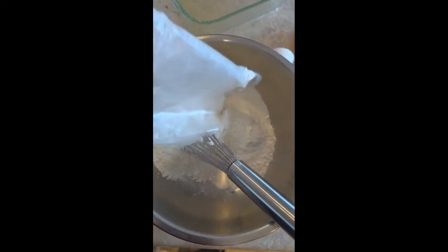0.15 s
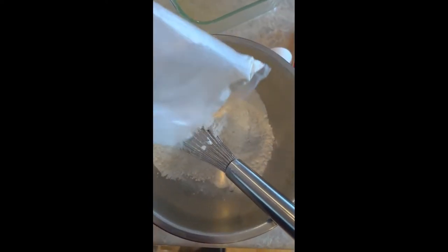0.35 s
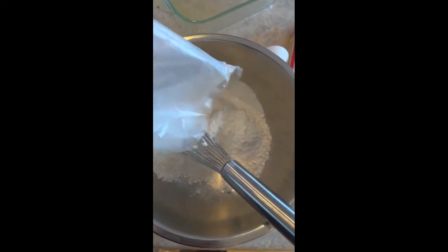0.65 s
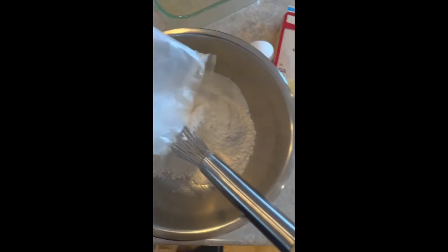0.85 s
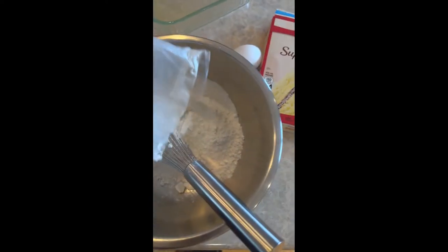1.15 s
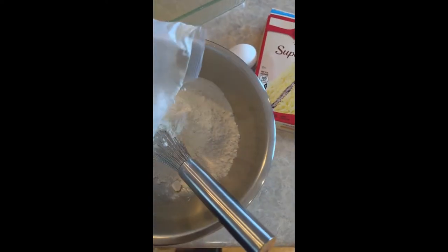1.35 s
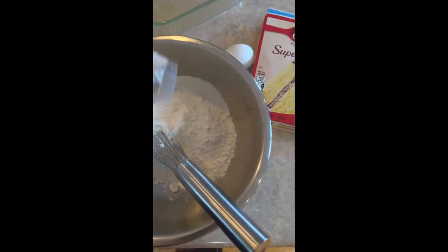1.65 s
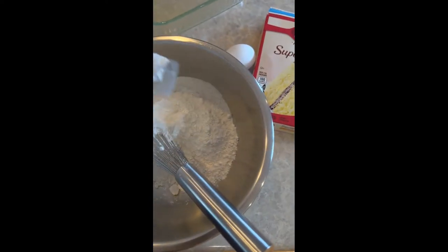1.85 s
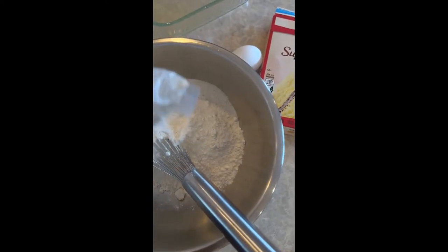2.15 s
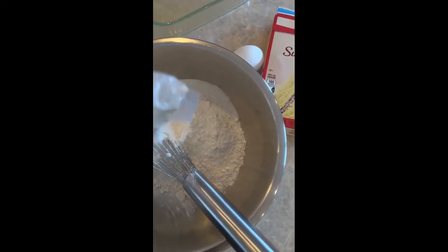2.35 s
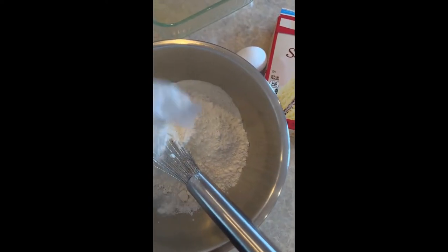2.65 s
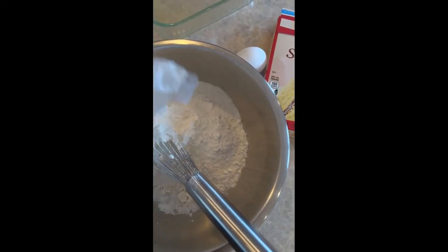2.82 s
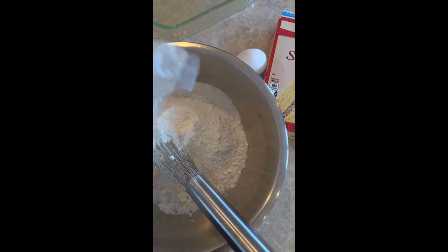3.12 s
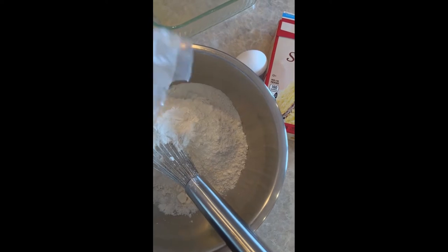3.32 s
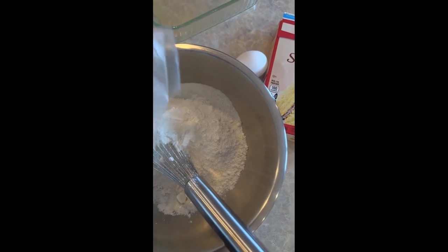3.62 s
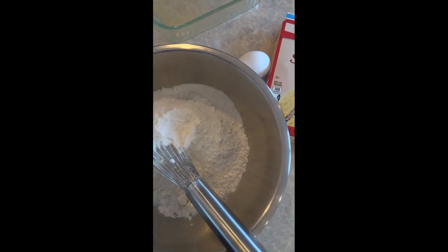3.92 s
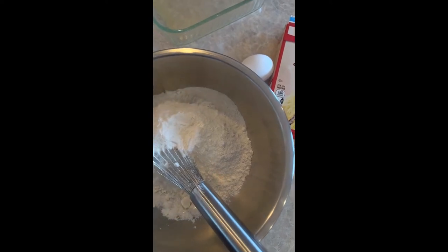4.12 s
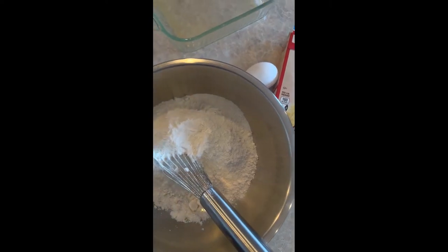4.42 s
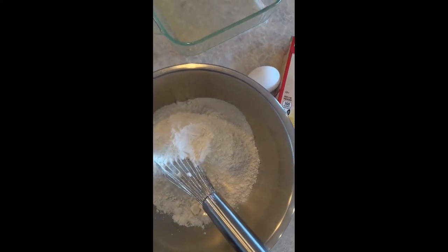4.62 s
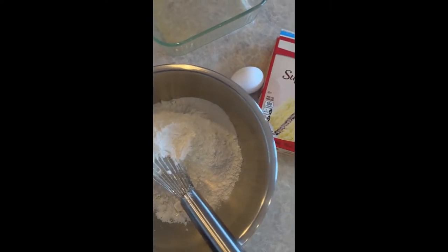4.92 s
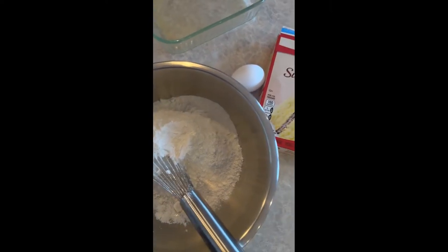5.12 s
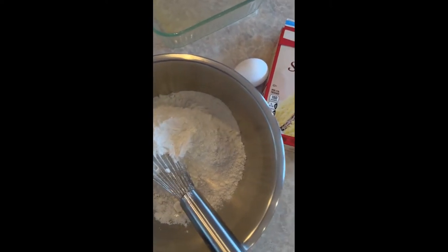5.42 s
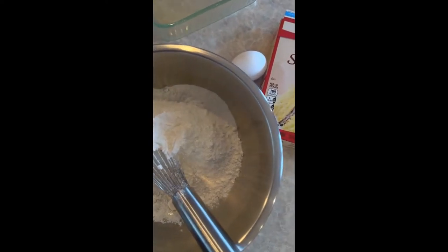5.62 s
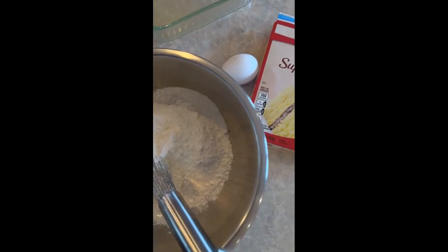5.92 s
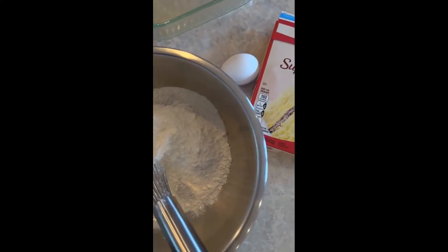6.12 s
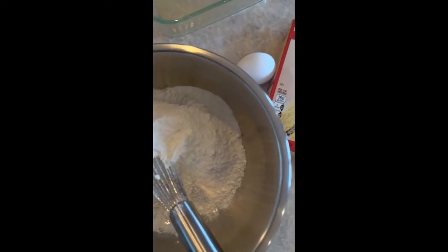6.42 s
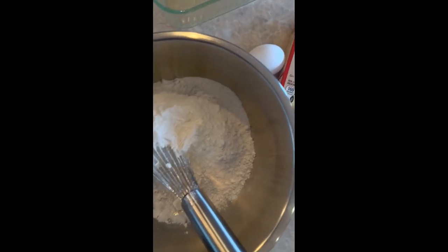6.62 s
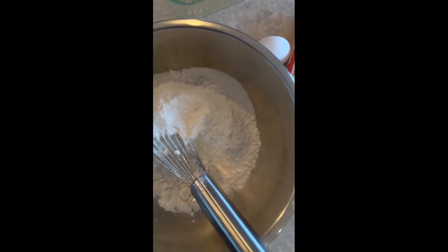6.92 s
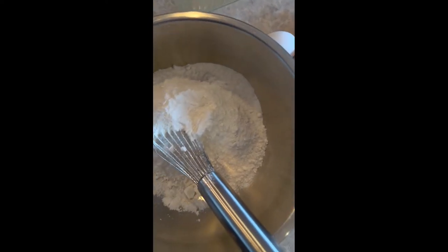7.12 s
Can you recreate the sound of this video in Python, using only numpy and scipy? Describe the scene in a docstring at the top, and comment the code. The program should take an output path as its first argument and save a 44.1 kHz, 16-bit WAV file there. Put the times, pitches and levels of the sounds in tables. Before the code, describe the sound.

Repeated quick shakes of crisp plastic film, two to six a second, snap and rustle very near in stereo, with powder landing softly on a heap and bassy air puffs. The bag is laid aside with small crackles and near silence. A drawer follows a little farther away with more room reverberation: a sharp knock, stuttering creaky groans, sliding hiss, bright steel clinks and a faint final rub of metal.

```python
"""A plastic bag of powder is shaken empty in a small kitchen and laid aside: filtered grains and noise
make its film rustle, and decaying sines make its creases snap. Shaped noise gives the puffs of air, and
low grains the powder landing softly on a heap. Later come faint squeaks of the film, then a drawer:
stick-slip pulses excite its resonances, filtered noise hisses, and struck or rubbed modes give its
metal utensils. A quiet room tone lies beneath."""
import sys
import numpy as np
from scipy import signal
from scipy.fft import rfft, irfft, next_fast_len
from scipy.io import wavfile
from scipy.ndimage import uniform_filter1d

SR = 44100
rng = np.random.default_rng(int(sys.argv[2]) if len(sys.argv) > 2 else 0)


def master(y):
    """Save y as 16-bit WAV."""
    cut = np.clip(np.atleast_2d(y).T, -1, 1)
    pcm = np.round(cut * 32767)  # scale
    wavfile.write(sys.argv[1], SR, pcm.astype(np.int16))


N = 319847
TIME = np.arange(N) / SR
STEPS = TIME[::32]  # coarse time grid for the level curves

# Background of the room: f/Hz, relative level/dB per Hz
ROOM_TONE = [(25, -12.5), (55, 9.5), (110, 4), (380, -9), (520, -16), (1200, -13), (3000, -18),
             (4300, -12.5), (5500, -22), (8000, -24), (11000, -27.5), (12500, -28.5), (16000, -41)]
ROOM_TONE_DB = -61

# Shakes or squeezes of the bag: t/s, rise/s, hold/s, then relative level/dB of rustle, crinkle and powder
SHAKES = [(0.1, 0.013, 0.027, -27.5, -26, -35), (0.178, .01, 0.008, -39, -44, -37),
          (0.293, 0.022, 0.071, -44.5, -42, -45), (0.42, 0.014, 0.027, -27.5, -27.5, -38.5),
          (0.473, 0.011, 0.021, -35.5, -39, -38), (0.589, 0.0036, 0.058, -48, -48.5, -50.5),
          (0.809, 0.023, 0.026, -38.5, -32, -48), (1.071, 0.0023, 0.0088, -28.5, -24.5, -39),
          (1.39, 0.0048, .02, -41, -36, -38), (1.463, .005, .04, -33, -33, -39),
          (1.604, .004, 0.062, -36, -41, -50), (1.735, .015, .055, -37, -37, -44),
          (1.863, 0.042, 0.11, -37.5, -44, -50), (2.05, 0.011, 0.059, -37, -43, -43),
          (2.245, 0.033, 0.026, -33.5, -36, -41.5), (2.329, 0.0076, 0.007, -36.5, -47, -45),
          (2.419, 0.0081, 0.076, -44, -48, -48.5), (2.57, 0.011, 0.024, -33.5, -34.5, -41),
          (2.655, 0.016, 0.015, -43.5, -40.5, -42), (2.775, 0.015, 0.035, -35.5, -34, -39),
          (2.959, 0.025, 0.049, -36, -39, -41.5), (3.165, 0.004, 0.017, -32.5, -30.5, -35.5),
          (3.22, 0.0058, 0.046, -40.5, -56, -46), (3.374, 0.018, 0.013, -32, -35.5, -38),
          (3.433, 0.0073, 0.0046, -34, -40, -40), (3.55, 0.015, 0.025, -28.5, -27.5, -37.5),
          (3.61, 0.011, 0.074, -37, -38, -43), (3.819, 0.015, 0.29, -60, -50, -72.5),
          (4.281, 0.0033, 0.11, -59, -54, -77), (4.53, 0.0029, 0.033, -39, -35.5, -50),
          (4.602, 0.0087, .04, -48, -42.5, -57.5), (4.78, .02, 0.023, -63, -72, -65)]
SHAKE_FALL_S = 0.024
# Stirring of the film between shakes and as it is laid aside: t/s, relative rustle level/dB
STIRRING = [(0.0, -45), (0.25, -52), (0.7, -58.5), (0.9, -44.5), (1.03, -58.5), (1.16, -47), (1.9, -45),
            (2.7, -54), (2.86, -47.5), (3.08, -54), (3.72, -54.5), (4.14, -62.5), (4.24, -67.5),
            (4.7, -55.5), (4.96, -89), (5.22, -68), (5.62, -61.5), (5.8, -90)]
# Relative to that rustle; the powder's value holds midway through the emptying
STIR_CRINKLE_DB, STIR_POWDER_DB = 0, -5
EMPTY_S = 3.75  # from here the trickle of powder between shakes weakens by 6 dB within 0.5 s

# Spectra of the folding film and of its finer creases: f/Hz, relative level/dB per Hz
RUSTLE = [(300, -11.5), (500, -13), (800, -7.5), (1250, 3), (1520, -4), (1900, 2.5), (3100, -6.5),
          (4500, -12.5), (8000, -20.5), (12000, -21.5)]
CRINKLE = [(2500, 4), (4000, 0.5), (5700, 0), (8200, -1), (10500, -1.5), (12500, -7.5), (16000, -13.5)]

# Spectra of falling powder and of moving air: f/Hz, relative level/dB per Hz
POWDER = [(90, -9.5), (150, -1.5), (230, -3), (400, -3), (600, 0), (1000, -22.5)]
PUFF = [(15, -42), (35, -16), (60, 3.5), (100, -2), (160, -11), (300, -28)]
# Puffs of air from the billowing bag: t/s, level/dB
PUFFS = [(0.08, -38), (0.16, -34.5), (0.35, -33.5), (0.45, -34.5), (0.675, -42), (0.86, -42.5),
         (1.095, -37), (1.481, -48), (2.1, -39), (2.365, -36), (2.59, -37.5), (2.81, -40), (2.985, -34),
         (3.18, -31.5), (3.395, -33.5), (3.47, -39), (3.565, -36), (3.73, -52), (4.388, -54), (4.589, -47)]
PUFF_RISE_S, PUFF_HOLD_S, PUFF_FALL_S = 0.014, 0.011, 0.026
DRAUGHT_DB = -5.5  # air that moves along with the powder, relative to it

# Single creases that snap through, loud and faint:
# t/s, relative crack level/dB, crack f/Hz, relative sheet level/dB
SNAPS = [(0.0959, -9, 6400, -30), (0.127, -8, 8200, -18), (0.1452, -10, 7100, -33),
         (0.1535, -19, 5100, -18.5), (0.1776, -5.5, 7600, -24), (0.2935, -17.5, 8950, -30),
         (0.3063, -17, 4780, -33), (0.4205, -7.5, 5030, -24), (0.4651, -11, 4000, -21),
         (0.4972, -7.5, 8660, -26), (0.5108, -14.5, 7700, -29), (0.5878, -11.5, 2740, -41),
         (0.626, -18, 3820, -25), (0.793, -15, 8400, -28), (0.8375, -11.5, 9000, -27),
         (0.8483, 1, 6100, -17), (0.8567, -2, 5350, -22), (0.9562, -42, 3600, -33),
         (1.0368, -29, 2400, -32.5), (1.0919, -5, 6300, -21), (1.1206, -21, 5500, -36),
         (1.1405, -16, 6400, -28), (1.1883, -17, 5470, -27), (1.2059, -10, 5700, -28),
         (1.2448, -11.5, 4070, -25.5), (1.2918, -29, 4600, -32), (1.31, -19.5, 7500, -27),
         (1.3484, -12, 5380, -22), (1.3776, -35, 2700, -20), (1.3873, -8.5, 6300, -34),
         (1.4059, -10.5, 4900, -16.5), (1.5317, -13, 4600, -38), (1.5776, -16.5, 4500, -23),
         (1.6039, -9, 4995, -20), (1.6186, -12, 3900, -20), (1.6677, -12.5, 3720, -20.5),
         (1.7141, -9.5, 3640, -23.5), (1.7629, -14, 4558, -19), (1.9375, -13, 3040, -31),
         (1.9681, -17, 4800, -25), (2.0539, -10.5, 4252, -20.5), (2.1751, -18, 7340, -28),
         (2.3315, -20, 5700, -29), (2.418, -27, 3813, -29.5), (2.4753, -17.5, 8230, -25),
         (2.5526, -13, 5960, -25), (2.6707, -24.5, 8500, -29), (2.776, -13.5, 7320, -25),
         (2.8534, -15.5, 3140, -33), (3.1227, -18.5, 4600, -32), (3.1656, -10, 3217, -17.5),
         (3.1784, -11, 6600, -20), (3.25, -27, 6630, -33), (3.3321, -20.5, 6000, -30),
         (3.525, -14.5, 7500, -22), (3.6709, -12, 6700, -33), (3.7198, -19.5, 5630, -51),
         (3.7443, -22, 4940, -51), (3.8296, -19.5, 3750, -50), (3.8504, -29, 4900, -48),
         (3.9046, -18, 4470, -41), (3.9702, -20, 5000, -52), (4.0327, -28, 3800, -62),
         (4.1477, -19, 4620, -40), (4.372, -30, 2475, -61), (4.531, -19, 5900, -29),
         (4.5646, -22, 6610, -48), (4.6313, -19.5, 4860, -51)]
# Random creases: greatest rate, centre frequency, relative crack level at brisk handling,
# sheet level relative to the crack, standard deviation of level
CREASES_PER_S, CREASE_HZ = 42, 4500
CREASE_DB, CREASE_SHEET_DB, CREASE_SPREAD_DB = -22, -9.5, 2
BRISK_DB, STILL_DB = -40, -62  # rustle of brisk handling; rustle below which no random crease snaps
CREASE_FOLLOWS = 0.63  # share of the rustle's swing in dB that the cracks follow
# Bending wave: level relative to the sheet, frequency limits, centre glide time constant, decay constant
BEND_DB, BEND_START_HZ, BEND_END_HZ = -12, 1298, 189.3
BEND_GLIDE_S, BEND_DECAY_S = 0.00603, 0.0094

# Squeaks of the film as the bag is put aside: t/s, level/dB
SQUEAKS = [(5.366, -58.5), (5.426, -54), (5.439, -59), (5.49, -63)]
SQUEAK_HZ = 4400

# Catches of the drawer runners: t/s, hold/s, relative level/dB, first and last slip rate/Hz, roughness
GROAN = [(5.688, 0.014, -48.5, 148, 147, 0.67), (5.769, 0.036, -57, 135, 122, 0.84),
         (5.858, 0.0095, -17, 125, 130, .52), (5.91, .025, -15, 136, 146, 0.44),
         (5.969, 0.0237, -17, 160, 176, .16), (6.043, 0.014, -17, 186, 182, .19),
         (6.337, .008, -28.5, 208, 196, 0.24), (6.378, 0.027, -24, 166, 141, 0.19),
         (6.455, 0.016, -33.5, 161, 158, 0), (6.55, 0.041, -20, 199, 204, 0.08),
         (6.76, 0.0515, -47.5, 210, 190, .8), (6.868, 0.021, -41.5, 267, 264, 1.03)]
GROAN_RISE_S, GROAN_FALL_S = 0.012, 0.026
# A groan dying down towards this relative level breaks up into uneven slips
CHATTER_DB, CHATTER_ROUGH = -41, 0.6
# Resonances of the drawer's box: f/Hz, width/Hz, relative level/dB
BOX_MODES = [(170, 74.4, -1.5), (262, 42, 0), (352, 42, 1.5), (410.7, 34, 2), (455, 38, -1.5),
             (561, 35, -6), (696.5, 36, -11), (854, 38, -11.5), (1009, 50, -21), (1168, 22, -16),
             (1490, 130, -22)]
# Cabinet rumble while the drawer is handled: t/s, hold/s, level/dB
RUMBLE = [(5.7, .25, -51.5), (6.1, 1.1, -62)]
# Pulls on the drawer: t/s, hold/s, relative hiss level/dB
PULLS = [(5.79, .29, -43.5), (6.12, 0.25, -43), (6.51, 0.084, -54.5), (6.86, .1, -65), (7.2, 0.011, -64)]
PULL_RISE_S, PULL_FALL_S = 0.02, 0.025
# Spectrum of the sliding hiss: f/Hz, relative level/dB per Hz
SLIDE_HISS = [(59, -60), (100, -11), (202, -1.5), (315, -9), (358, -7), (492, -17), (705, -10.5),
              (1250, -14), (2420, -11.5), (3320, -25.5), (6840, -21), (8280, -26), (9210, -25),
              (12900, -30), (16000, -33)]
# Resonances of the runners: f/Hz, width/Hz, relative level/dB
RUNNER_MODES = [(730, 23, -0.5), (874, 43, -1.5), (1025, 55, 2.5), (1703, 75, -2), (1870, 240, -8),
                (2418, 130, -10), (3004, 70, -8), (3500, 120, -9), (4050, 380, -10.5), (4570, 140, -8),
                (6240, 170, -10), (7170, 90, -20.5), (9480, 50, -10.5), (10500, 37, -25)]

# Dull ticks in the drawer: t/s, relative level/dB, ring f/Hz
TICKS = [(5.8039, -12, 6730), (6.6939, -33, 8190), (6.7568, -35.5, 4570), (7.0027, -35.5, 7530),
         (7.0607, -46, 7640), (7.0963, -43, 7640), (7.1182, -39, 7640)]
# Utensils knocking together: t/s, relative level/dB
CLINKS = [(5.8041, -13), (5.9404, -27), (5.989, -24.5), (6.0048, -22.5), (6.127, -51), (6.2212, -33),
          (6.354, -48), (6.5918, -50)]
# Modes of the struck steel: f/Hz, relative level/dB, t60/s
STEEL_MODES = [(4500, -22, 0.072), (6220, 3.5, 0.073), (7030, 5.5, .12), (7120, 6.5, 0.14),
               (7580, -4, 0.17), (9550, -17, 0.83), (10310, -34.5, 0.65)]
# A utensil drawn along its neighbours: t/s, hold/s, relative level/dB
RUBS = [(6.88, .1, -56.5), (7.05, 0.076, -56)]
RUB_RISE_S, RUB_FALL_S = 0.045, 0.023
# Modes of the rubbed utensil: f/Hz, width/Hz, relative level/dB
RUBBED_MODES = [(1380, 14, -18), (1433, 9, -0.5), (3560, 160, -4.5), (6100, 130, -6), (6890, 27, -14),
                (7400, 24, -13.5), (7500, 22, -9), (9870, 65, -32)]

MIC_LAG_S = 0.00013  # delay of the right microphone for sound from the left
KITCHEN_T60_S = 0.33
CUTOFF_HZ = 16000
# Gain of the left-right difference: f/Hz, level/dB
PORTS = [(60, 13), (130, 0), (250, 12.5), (500, 9.5), (1000, 0.5), (2000, -4), (4000, 1.5), (8000, 1),
         (13000, -0.5)]


def from_db(db):
    """Amplitude ratio: 20 dB is a factor of ten."""
    return 10 ** (np.asarray(db) / 20)


def rms_one(x):
    """Normalisation: scale to unit mean power."""
    return x / np.sqrt(np.mean(x ** 2) + 1e-20)


def together(a_db, b_db):
    """Incoherent addition: the powers of unrelated sounds add."""
    return 10 * np.log10(from_db(a_db) ** 2 + from_db(b_db) ** 2)


def in_time(rows):
    """Linear interpolation: each column of a curve at every sample."""
    s, *columns = np.transpose(rows)
    return [np.interp(TIME, s, column) for column in columns]


def swell(s, held_s, db, rise_s, fall_s):
    """Exponential growth and decay: power of one gesture that rises, holds and dies away."""
    before = np.maximum(s - STEPS, 0) / rise_s
    after = np.maximum(STEPS - s - held_s, 0) / fall_s
    return (from_db(db) * np.exp(-np.minimum(before + after, 20))) ** 2


def level_of(gestures):
    """Incoherent addition: level in dB of several gestures together, at every sample."""
    return np.interp(TIME, STEPS, 10 * np.log10(sum(gestures)))


def swells(rows, rise_s, fall_s):
    """Superposition: level of gestures (t/s, hold/s, level/dB) that share one rise and one fall."""
    return level_of(swell(s, held_s, db, rise_s, fall_s) for s, held_s, db in rows)


def drift(rate):
    """Slow random modulation: unit rms, joining about rate random values a second by lines."""
    knots = rng.standard_normal(8000)
    return rms_one(np.interp(TIME * rate, np.arange(len(knots)), knots))


def colour(x, spectrum):
    """Linear filtering: weight x by a spectrum that falls steeply beyond its ends; unit rms."""
    hz, db = np.transpose(spectrum)
    size = next_fast_len(N)
    octave, known = np.log2(np.fft.rfftfreq(size, 1 / SR) + 1), np.log2(hz)
    beyond = np.abs(octave - np.clip(octave, known[0], known[-1]))
    gain = from_db(np.interp(octave, known, db) - 20 * beyond)  # 20 dB per octave outside
    return rms_one(irfft(rfft(x, size) * gain, size)[..., :N])


def ring(clicks, hz, t60):
    """Damped oscillator: a unit click starts a decaying sine of initial amplitude one."""
    radius, angle = from_db(-60 / (t60 * SR)), 2 * np.pi * hz / SR
    poles = [1, -2 * radius * np.cos(angle), radius * radius]
    return signal.lfilter([0, np.sin(angle)], poles, clicks + 1e-18)


def resonate(force, modes):
    """Modal superposition: parallel resonances of alternating sign, their peaks set by level."""
    out = 0
    for k, (hz, width, db) in enumerate(modes):
        out = out + (-1) ** k * from_db(db) * width * ring(force, hz, 2.2 / width)
    return out


def two_mics(x, lag_s):
    """Time difference of arrival: sound reaches the right microphone lag_s after the left."""
    size = next_fast_len(len(x) + 64)
    delay = np.exp(-2j * np.pi * np.fft.rfftfreq(size, 1 / SR) * lag_s)
    late = irfft(rfft(x, size) * delay, size)
    return np.array([x, late[:len(x)]])


def diffuse(count, alike_hz):
    """Diffuse-field coherence: stereo noise alike in the bass and unrelated in the treble."""
    mid, side = rng.standard_normal((2, count))
    side = signal.sosfilt(signal.butter(2, alike_hz, "high", fs=SR, output="sos"), side)
    return np.array([mid + side, mid - side]) / np.sqrt(2)


def add(out, s, sound):
    """Superposition: mix a short stereo sound in at time s."""
    at = max(round(s * SR), 0)
    out[:, at:at + sound.shape[1]] += sound[:, :N - at]


def grains(per_s, spread_db, low_hz, high_hz, cycles, lag_s, count=16):
    """Random impulse excitation: contacts of random size and pitch, from straight ahead or the left."""
    at = np.flatnonzero(rng.random(N) < per_s / SR)
    sizes = from_db(spread_db * np.minimum(rng.exponential(1, N), 3)) * rng.choice([-1, 1], N)
    dealt = rng.integers(0, count, N)  # pitch given to each contact
    places = np.zeros((2, N))
    for k, hz in enumerate(np.geomspace(low_hz, min(high_hz, SR * 0.45), count)):
        clicks, mine = np.zeros(N), at[dealt[at] == k]
        clicks[mine] = sizes[mine] * hz ** 0.75
        places[k % 2] += ring(clicks, hz, cycles / hz)
    return rms_one(places[0] + two_mics(places[1], lag_s))


def flex(x, depth_db, size=512):
    """Time-varying resonance: patches of the spectrum swell and fade at random, as in a folding sheet."""
    frames = signal.stft(x, nperseg=size)[2]
    patches = uniform_filter1d(rng.standard_normal(frames.shape[1:]), size=3, axis=0)
    gain = from_db(depth_db * rms_one(uniform_filter1d(patches, size=4, axis=1)))
    return signal.istft(frames * rms_one(gain), nperseg=size)[1][:, :N]


def room_tone():
    """Stationary background noise: a steady coloured diffuse field."""
    return from_db(ROOM_TONE_DB) * colour(diffuse(N, 1000), ROOM_TONE)


def shaking():
    """Common excitation: each shake swells rustle, crinkle and powder above the stirring of the film."""
    stir_db, = in_time(STIRRING)
    emptying_db = np.interp(TIME - EMPTY_S, [0, 0.5], [3, -3])
    between = stir_db, stir_db + STIR_CRINKLE_DB, stir_db + STIR_POWDER_DB + emptying_db
    levels = []
    for layer, low_db in enumerate(between):
        shake_db = level_of(swell(s, held_s, dbs[layer], rise_s, SHAKE_FALL_S)
                            for s, rise_s, held_s, *dbs in SHAKES)
        levels.append(together(shake_db, low_db))
    return levels


def crinkling(rustle_db, crinkle_db):
    """Impulsive film buckling: folds rustle and small creases fizz; gently handled, the film swishes."""
    crisp = np.interp(rustle_db, [-64, -50], [0.15, 0.9])  # share of separate grains
    swish = np.sqrt(1 - crisp ** 2) * rms_one(diffuse(N, 1600))
    folds = grains(per_s=1900, spread_db=2.5, low_hz=390, high_hz=9500, cycles=8.6, lag_s=0.00008)
    rustle = colour(crisp * folds + swish, RUSTLE) * rms_one(from_db(2.5 * drift(80)))
    creases = grains(per_s=2000, spread_db=6.5, low_hz=2760, high_hz=15500, cycles=10, lag_s=MIC_LAG_S)
    fizz = colour(crisp * creases + swish[:, ::-1], CRINKLE)  # swish reversed in time to differ
    return rustle * from_db(rustle_db - 2.0) + fizz * from_db(crinkle_db - 2.5)


def falling_powder(level_db):
    """Damped impact: soft clumps thud on the heap as low, short-lived grains."""
    clumps = grains(per_s=500, spread_db=4, low_hz=107, high_hz=813, cycles=5, lag_s=0.00006, count=10)
    return colour(clumps, POWDER) * from_db(level_db)


def air_puffs(powder_db):
    """Flow noise: the billowing bag fans low-frequency air at the microphones."""
    puff_db = swells([(s, PUFF_HOLD_S, db) for s, db in PUFFS], PUFF_RISE_S, PUFF_FALL_S)
    return colour(rng.standard_normal(N), PUFF) * from_db(together(puff_db, powder_db + DRAUGHT_DB))


def snap(hz, sheet_db, crack_t60, scatter_db, scatter_t60):
    """Impulse response: a brief crack, the ring of the sheet around it, one early echo and scatter."""
    t = np.arange(2048) / SR
    pitches = hz * np.array([0.62, 1, 1.35, 1.9]) * np.exp(rng.normal(0, 0.084, 4))
    heights = np.array([0.62, -0.96, 0.6, -0.55]) * (pitches < CUTOFF_HZ)
    crack = heights @ np.sin(2 * np.pi * pitches[:, None] * t) * 1000 ** (-t / crack_t60)
    sheet_hz = np.array([750, 1300, 2100]) * np.exp(rng.normal(0, 0.14, 3))
    sheet = np.array([0.45, -0.7, 0.7]) @ np.sin(2 * np.pi * sheet_hz[:, None] * t) * np.exp(-t / 0.0016)
    lag_s = MIC_LAG_S * (rng.random() < 0.7)  # from the left or from straight ahead
    direct = two_mics(crack, lag_s) + from_db(sheet_db) * two_mics(sheet, lag_s * 0.086)
    echo = np.roll(direct, round(rng.uniform(0.0008, 0.0024) * SR), axis=1)
    direct = direct + from_db(-8) * echo
    scatter = diffuse(len(t), 2200) * 1000 ** (-t / scatter_t60)
    scatter = scatter / np.sqrt(np.sum(scatter[0] ** 2))
    scattered = signal.fftconvolve(direct[:1], scatter, axes=1)[:, :len(t)]
    return direct + from_db(scatter_db) * scattered


def bending():
    """Dispersion: the lows of a bending wave arrive last, giving a short falling chirp."""
    t = np.arange(2048) / SR
    glide_s = BEND_GLIDE_S * np.exp(0.25 * rng.standard_normal())
    hz = BEND_END_HZ + (BEND_START_HZ - BEND_END_HZ) * np.exp(-t / glide_s)
    chirp = np.sin(2 * np.pi * np.cumsum(hz) / SR) * np.exp(-t / BEND_DECAY_S)
    return two_mics(chirp, 0.00005)


def random_creases(rustle_db):
    """Poisson-like events: creases snap more often and harder as the film is worked; rows as in SNAPS."""
    busy = np.clip((rustle_db - STILL_DB) / (BRISK_DB - STILL_DB), 0, 1)
    at = np.flatnonzero(rng.random(N) < CREASES_PER_S * busy / SR)
    size, pitch = rng.standard_normal((2, N))[:, at]
    db = CREASE_DB + CREASE_FOLLOWS * (rustle_db[at] - BRISK_DB) + CREASE_SPREAD_DB * size
    return list(zip(at / SR, db, CREASE_HZ * np.exp(0.3 * pitch), db + CREASE_SHEET_DB))


def bag_snaps(rustle_db):
    """Snap-through buckling: each crease cracks and sends a bending wave through the film."""
    out = np.zeros((2, N))
    for s, db, hz, sheet_db in list(SNAPS) + random_creases(rustle_db):
        crack = snap(hz, sheet_db - db + 0.5, crack_t60=0.0024, scatter_db=-2.5, scatter_t60=0.016)
        add(out, s, from_db(db + 1.0) * crack)
        add(out, s, from_db(sheet_db + BEND_DB) * bending())
    return out


def squeaks():
    """Friction-excited resonance: film rubs on film in short thin chirps of narrow-band noise."""
    level = sum(from_db(db) * np.exp(-((TIME - s) / 0.0038) ** 2) for s, db in SQUEAKS)
    return level * rms_one(ring(rng.standard_normal(N), SQUEAK_HZ, 0.013))


def catching():
    """Stick-slip control: slip rate, level and roughness; each groan glides and roughens as it dies."""
    level_db = swells([row[:3] for row in GROAN], GROAN_RISE_S, GROAN_FALL_S)
    points = []
    for s, held_s, _, first, last, rough in GROAN:
        points += [(s, first, rough), (s + held_s, last, rough)]
    per_s, rough = in_time(points)
    chatter = CHATTER_ROUGH / (1 + from_db(level_db - CHATTER_DB))
    return per_s, level_db, np.maximum(rough, chatter)


def groan():
    """Stick-slip oscillation: slip pulses drive the box; smooth slips are rounder, rough ones noisy."""
    per_s, groan_db, rough = catching()
    rough = np.clip(rough, 0, 1)
    turns = np.cumsum(per_s * (1 + 0.1 * rough * drift(150))) / SR
    pulses = np.diff(np.floor(turns), prepend=0)  # one pulse for each whole turn
    slips = rms_one(pulses * from_db(5 * rough * drift(200)))
    rounded = signal.sosfilt(signal.butter(4, 470, fs=SR, output="sos"), slips)
    sharp = np.clip(0.037 + 2.0 * rough, 0, 1)
    force = (1 - sharp) * rms_one(rounded) * 0.19 + sharp * slips
    force = force + 1.9 * rough * rng.standard_normal(N)
    box = resonate(force, BOX_MODES)
    box = signal.sosfilt(signal.butter(3, 95, "high", fs=SR, output="sos"), box)
    box = box / np.sqrt(uniform_filter1d(box ** 2, size=900) + 1e-12)  # even out the running level
    return two_mics(box, 0.000062) * from_db(groan_db - 1.5)


def cabinet_rumble():
    """Structure-borne noise: the cabinet rumbles at low frequency while the drawer is handled."""
    return colour(rng.standard_normal(N), PUFF) * from_db(swells(RUMBLE, PULL_RISE_S, PULL_FALL_S))


def sliding_hiss():
    """Sliding friction: a fluttering broadband hiss sets the runners ringing."""
    hiss_db = swells(PULLS, PULL_RISE_S, PULL_FALL_S)
    ringing = rms_one(resonate(diffuse(N, 1900), RUNNER_MODES))
    grind = colour(diffuse(N, 1600), SLIDE_HISS) + from_db(-3.5) * ringing
    return flex(grind, depth_db=2.0) * from_db(hiss_db + 3.5 + 3.1 * drift(45))


def ticks():
    """Heavily damped impact: light touches in the drawer give dull, short ticks."""
    out = np.zeros((2, N))
    for s, db, hz in TICKS:
        add(out, s, from_db(db - 8) * snap(hz, -7.5, crack_t60=0.004, scatter_db=1, scatter_t60=0.05))
    return out


def clinks():
    """Modal excitation by impact: each knock drives the steel modes unevenly."""
    s, db = np.transpose(CLINKS)
    out = np.zeros((2, N))
    for hz, mode_db, t60 in STEEL_MODES:
        clicks = np.zeros(N)
        uneven_db = rng.normal(0, 1.7, len(s))
        clicks[np.round(s * SR).astype(int)] = from_db(db + mode_db - 18 + uneven_db)
        out += two_mics(ring(clicks, hz, t60), MIC_LAG_S * rng.normal(0, 0.23))
    return out


def rubbing():
    """Friction-driven modes: unsteady noise keeps a utensil singing."""
    rub_db = swells(RUBS, RUB_RISE_S, RUB_FALL_S)
    friction = rng.standard_normal(N) * from_db(6.1 * drift(80))
    singing = sum(from_db(db) * rms_one(ring(friction, hz, 2.2 / width)) for hz, width, db in RUBBED_MODES)
    return rms_one(singing) * from_db(rub_db - 2.5)


def kitchen(x, wet_db, wall_hz):
    """Reverberation: tiles and cupboards return a dense, slightly dull, exponentially decaying tail."""
    t = np.arange(SR // 2) / SR
    tail = diffuse(len(t), 900) * 1000 ** (-t / KITCHEN_T60_S) * (t > 0.004)
    tail = tail / np.sqrt(np.sum(tail[0] ** 2))
    tail = signal.sosfilt(signal.butter(1, min(wall_hz, SR * 0.45), fs=SR, output="sos"), tail)
    return x + from_db(wet_db) * signal.fftconvolve(x[:1], tail, axes=1)[:, :N]


def ports(x):
    """Mid-side weighting: the difference between the two microphones depends on frequency."""
    hz, db = np.transpose(PORTS)
    size = next_fast_len(N)
    gain = from_db(np.interp(np.log(np.fft.rfftfreq(size, 1 / SR) + 1), np.log(hz), db))
    mid, side = (x[0] + x[1]) / 2, (x[0] - x[1]) / 2
    side = irfft(rfft(side, size) * gain, size)[:N]
    return np.array([mid + side, mid - side])


def scene():
    """Direct-to-reverberant ratio: bag and powder are near, the drawer further off, over room tone."""
    rustle_db, crinkle_db, powder_db = shaking()
    film = flex(crinkling(rustle_db, crinkle_db), depth_db=3.2)
    powder = falling_powder(powder_db) + air_puffs(powder_db)
    utensils = kitchen(clinks() + rubbing() + ticks(), wet_db=-5.5, wall_hz=8830)
    drawer = kitchen(sliding_hiss() + cabinet_rumble() + groan(), wet_db=-6, wall_hz=4000)
    far = (utensils + drawer) * from_db([[-0.2], [0.2]])  # slightly to the right
    quiet = room_tone()
    bag = film + powder + squeaks() + bag_snaps(rustle_db)
    near = kitchen(bag, wet_db=-13, wall_hz=7000)
    return near + far + quiet


def record(dry):
    """Band limitation: treble is weakened near 13 kHz, peaks clip at full scale and the top is cut."""
    dull = signal.sosfilt(signal.butter(2, [11800, 14500], "band", fs=SR, output="sos"), dry)
    heard = np.clip(ports(dry - 0.4 * dull), -1, 1)
    return signal.sosfilt(signal.ellip(10, 0.2, 80, CUTOFF_HZ, fs=SR, output="sos"), heard)


dry = scene()
out = record(dry)
master(out)
```